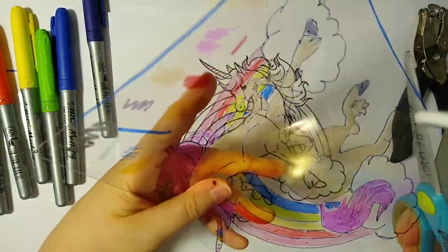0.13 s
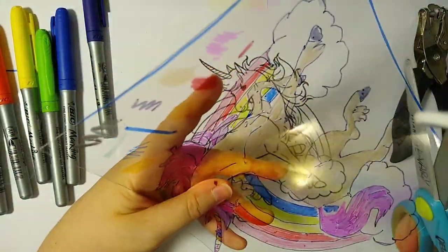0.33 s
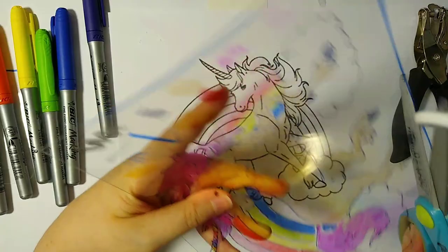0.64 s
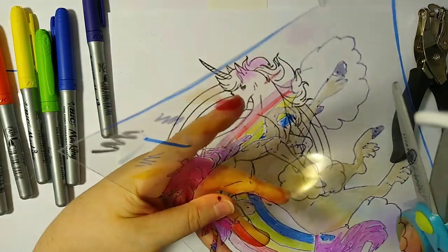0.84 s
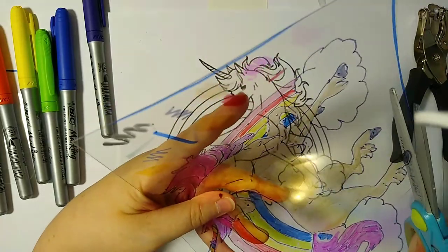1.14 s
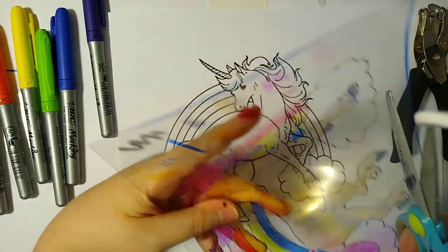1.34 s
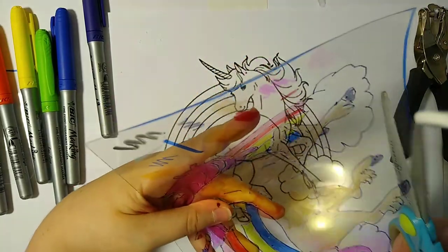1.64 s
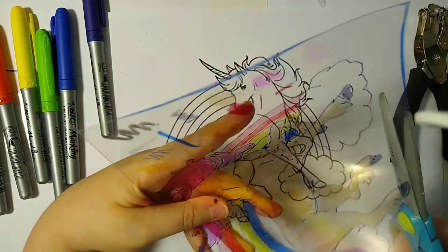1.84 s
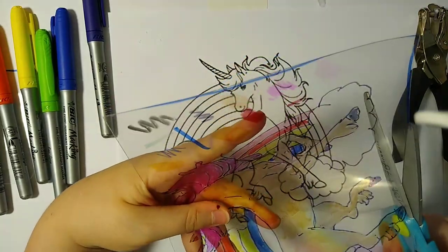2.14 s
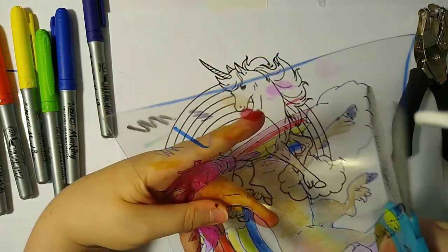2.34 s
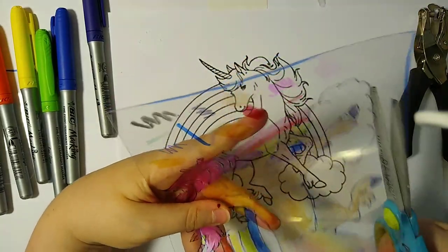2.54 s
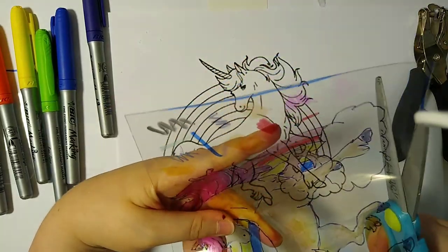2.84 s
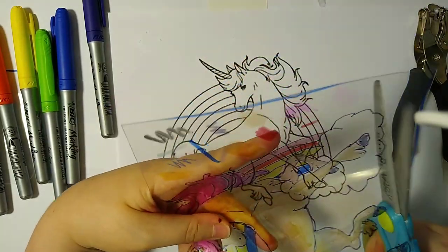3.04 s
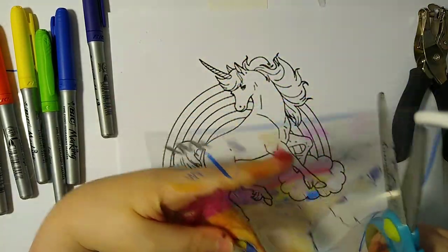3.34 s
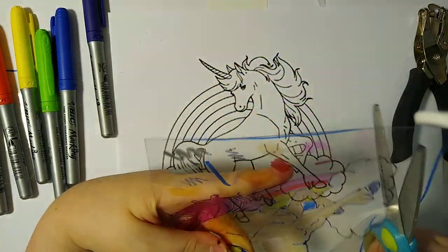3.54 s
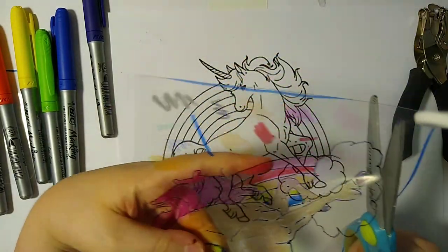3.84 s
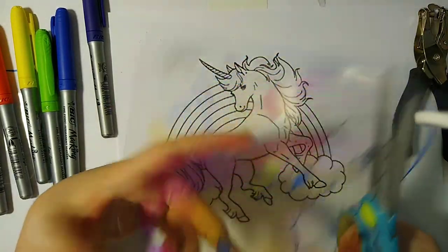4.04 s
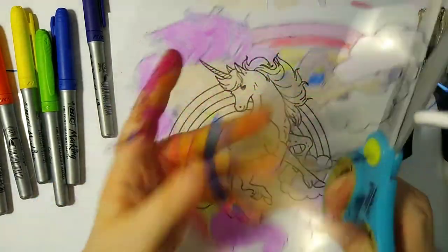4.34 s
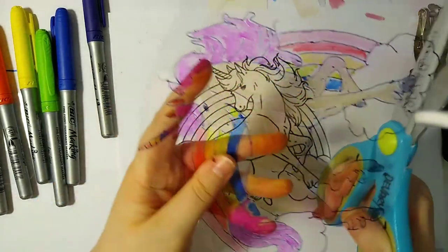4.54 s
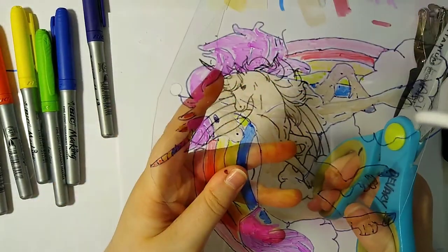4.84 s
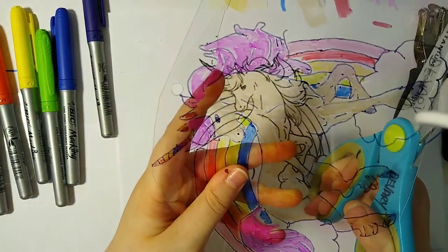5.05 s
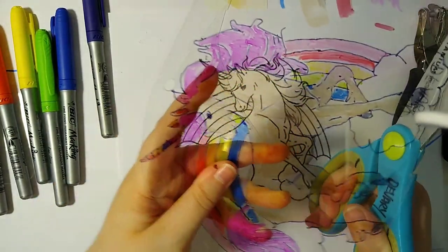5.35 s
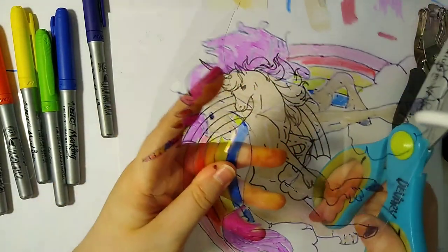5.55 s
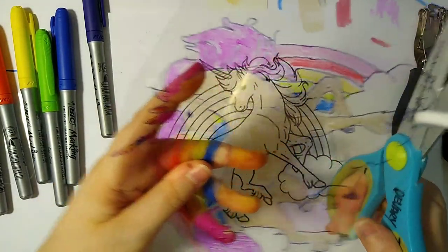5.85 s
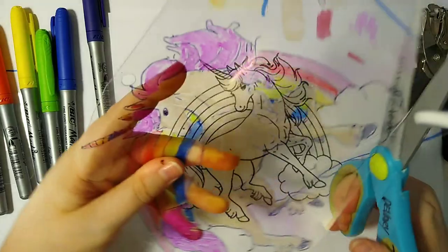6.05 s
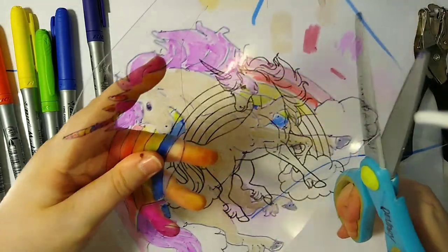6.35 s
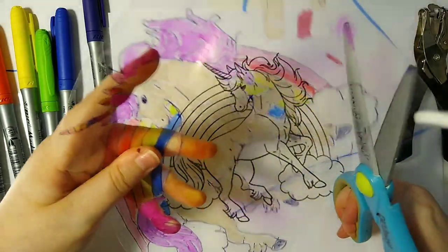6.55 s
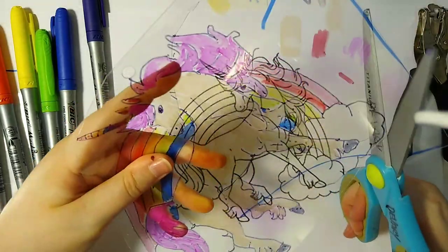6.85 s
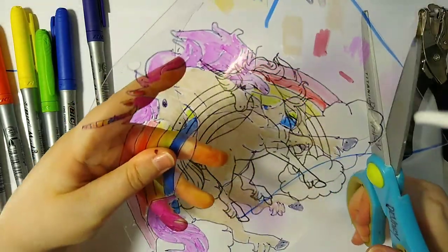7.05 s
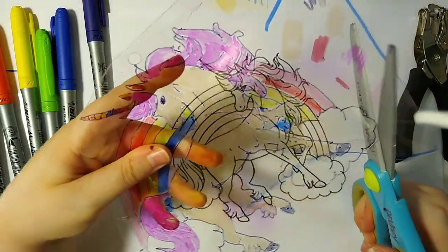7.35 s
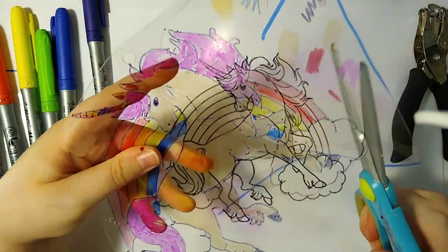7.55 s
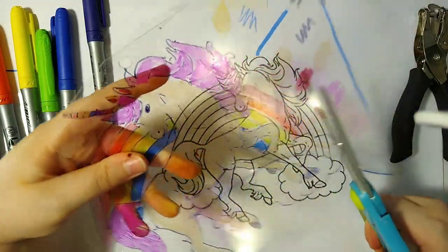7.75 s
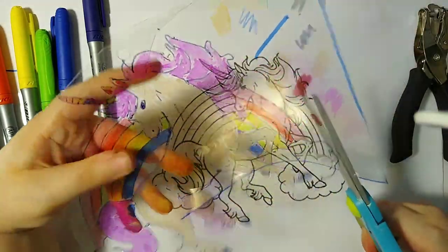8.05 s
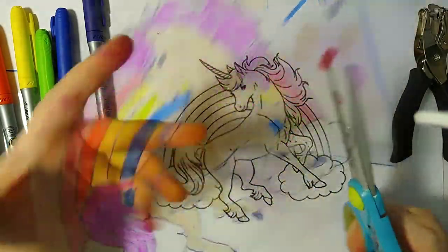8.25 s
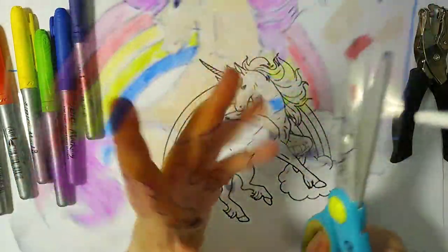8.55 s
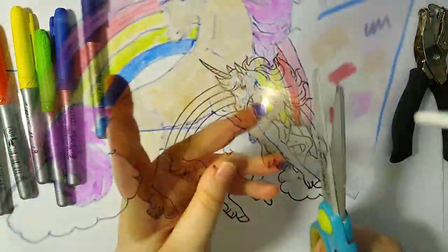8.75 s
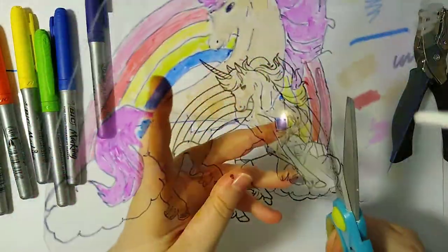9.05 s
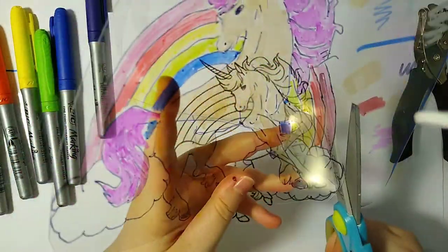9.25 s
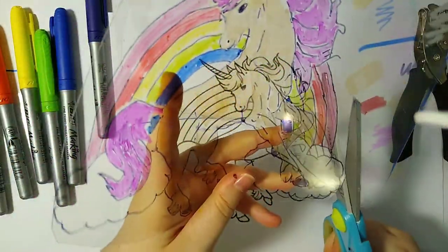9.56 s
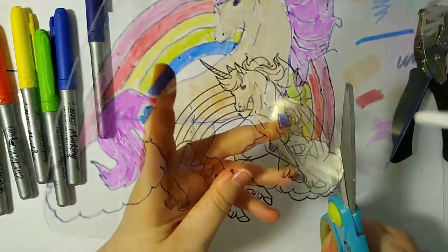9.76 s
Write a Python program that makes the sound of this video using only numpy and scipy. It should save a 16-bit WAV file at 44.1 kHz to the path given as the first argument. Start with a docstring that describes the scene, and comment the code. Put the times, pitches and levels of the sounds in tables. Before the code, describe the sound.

Crisp plastic cutting with rasping blade openings, sharp snaps and small woody ticks, heard close in a small quiet room with low rumble.

```python
"""Scissors work through a thin, stiff plastic sheet over a table in a small quiet room, above a low hum and rumble.
Cuts crunch and opening blades rasp (stick-slip friction through ringing modes); edges tick and plastic snaps.
Faint low tones glide through; later come soft knocks (table modes) and light scrapes of the flat blade.
Then the sheet rings briefly when tapped or flipped, bends and ticks woodily, and light rubbing makes it squeak;
cuts, scrapes and snaps return, and the last seconds bring more squeaks, woody creaks and one short cut."""
import sys
import numpy as np
from scipy import signal
from scipy.fft import rfft, irfft
from scipy.io import wavfile
from scipy.ndimage import uniform_filter1d

SR = 44100
rng = np.random.default_rng(int(sys.argv[2]) if len(sys.argv) > 2 else 0)


def master(y):
    """Save y as 16-bit WAV."""
    cut = np.clip(np.atleast_2d(y).T, -1, 1)
    pcm = np.round(cut * 32767)  # scale
    wavfile.write(sys.argv[1], SR, pcm.astype(np.int16))


N = 436590
TIME = np.arange(N) / SR


def from_db(db):
    """Logarithmic level: decibels become an amplitude gain."""
    return 10 ** (np.asarray(db) / 20)


def rms_one(x):
    """Effective value: scale to rms 1."""
    return x / np.sqrt(np.mean(x ** 2) + 1e-20)


def hold_even(x, size, floor):
    """Level control: divide by the running rms over size samples."""
    return x / np.sqrt(np.abs(uniform_filter1d(x ** 2, size=size)) + floor)


def level_over_time(rows):
    """Linear interpolation of a level curve (t/s, level/dB) at every sample."""
    t_s, level_db = np.transpose(rows)
    return np.interp(TIME, t_s, level_db)


def at_hz(points, hz):
    """Linear interpolation of a spectrum on a log-frequency axis."""
    f, value = np.transpose(points)
    return np.interp(np.log(hz + 1), np.log(f), value)


def band(x, low_hz, high_hz):
    """Causal band-pass filtering."""
    sos = signal.butter(2, [low_hz, high_hz], "band", fs=SR, output="sos")
    return signal.sosfilt(sos, x + 1e-18)


def first_order(x, hz, kind):
    """First-order filtering, low-pass or high-pass."""
    return signal.sosfilt(signal.butter(1, hz, kind, fs=SR, output="sos"), x)


def convolve(x, response):
    """Linear superposition: every sample launches one impulse response."""
    return signal.oaconvolve(x, response)[:len(x)]


def response_of(colour, size=4096):
    """Minimum phase: the folded cepstrum gives the causal impulse response of a given spectrum."""
    hz = np.arange(size // 2 + 1) * SR / size
    cepstrum = irfft(np.log(from_db(at_hz(colour, hz))))
    cepstrum[1:size // 2] *= 2
    cepstrum[size // 2 + 1:] = 0
    return irfft(np.exp(rfft(cepstrum)))


def resonance(x, hz, width_hz):
    """Damped resonance: one mode with gain 1 at its peak."""
    r = np.exp(-np.pi * width_hz / SR)
    numerator = [(1 - r * r) / 2, 0, (r * r - 1) / 2]
    return signal.lfilter(numerator, [1, -2 * r * np.cos(2 * np.pi * hz / SR), r * r], x)


# colour of the low rumble and of the faint room hiss: f/Hz, level/dB
RUMBLE_COLOUR = [(20, -29), (38, -14.5), (55, -3), (80, -4), (125, -1), (178, -8), (205, -17), (420, -35.5),
                 (1000, -63.5)]
HISS_COLOUR = [(450, -9.5), (900, 4), (1500, -6.5), (2400, -5), (4000, -13.5), (10000, -13.5), (15000, -19)]
# level of the rumble: t/s, level/dB
RUMBLE_LEVEL = [(0.0, -60.5), (4.3, -57.5), (5.2, -58.5), (7.8, -60), (9.9, -68.5)]


def rumble_and_hiss():
    """Filtered noise: random fluctuations coloured into a low rumble and a steady faint hiss."""
    rumble = rms_one(convolve(rng.standard_normal(N), response_of(RUMBLE_COLOUR)))
    hiss = rms_one(convolve(rng.standard_normal(N), response_of(HISS_COLOUR)))
    return from_db(level_over_time(RUMBLE_LEVEL)) * rumble + from_db(-81.5) * hiss


def wavering_tone(hz, db, waver_db, wander, per_s=9):
    """Random modulation: a sine whose level swells and sags and whose pitch strays slowly by a share."""
    t = TIME[:len(db)]
    swells, strays = rng.standard_normal((int(t[-1] * per_s) + 2, 2)).T
    knots = np.arange(len(swells))
    pitch = hz * np.exp(wander * np.interp(2 * t, knots, strays))
    level_db = db + waver_db * np.interp(t * per_s, knots, swells)
    return from_db(level_db) * np.sqrt(2) * np.sin(2 * np.pi * np.cumsum(pitch) / SR)


HUM_HZ = 58.56
# common level of the hum: t/s, level/dB
HUM_LEVEL = [(0, -62), (2.8, -58), (3.7, -62.5), (4.7, -55), (5.6, -79), (7, -69.5)]
# its partials: multiple of the fundamental, level/dB on top of the common level
HUM_PARTIALS = [(1, -13), (2, -2.5), (3, -11.5)]


def hum():
    """Harmonic series: partials at whole multiples of one fundamental, each wavering on its own."""
    level_db = level_over_time(HUM_LEVEL)
    return sum(wavering_tone(order * HUM_HZ, level_db + db, waver_db=5.0, wander=0.028)
               for order, db in HUM_PARTIALS)


# resonances of sheet and blades: f/Hz, width/Hz, lift/dB
SHEET_MODES = [(528, 8.3, 2), (900, 360, -0.5), (1230, 76, 0), (1683, 42, 2.5), (1851, 97, 6),
               (2250, 280, -2), (2442, 260, 4.5), (3040, 85, -0.5), (5634, 86, 0.5)]
SHEET_DETUNE = .025   # typical share by which a new grip shifts all the sheet's resonances


def sheet_response(colour):
    """Modal radiation: one tiny crack as a broad colour plus ringing modes, tuned by the grip."""
    crack = response_of(colour)
    tuning = np.exp(SHEET_DETUNE * rng.standard_normal())
    ringing = sum(from_db(lift_db) * resonance(crack, hz * tuning, width_hz)
                  for hz, width_hz, lift_db in SHEET_MODES)
    return crack + ringing


def registers(x):
    """Band splitting: the sheet's drumming, the crunch (polarity reversed) and the bright edge noise."""
    return band(x, 90, 1300), -band(x, 1300, 5000), band(x, 5000, 20000)


def flutter(ring_s, direct_db, size=2048):
    """Multiple reflection: bending waves echo between edges and grip as dense decaying noise; energy 1."""
    echoes = rng.standard_normal(size) * np.exp(-TIME[:size] / ring_s)
    echoes = rms_one(first_order(echoes, 900, "high")) / np.sqrt(size)
    echoes[0] += from_db(direct_db)
    return rms_one(echoes) / np.sqrt(size)


HOLD_S = .09   # longest spacing between successive sets of resonances


def shifting_flutter(x, ring_s, direct_db):
    """Time-varying resonance: as the sheet bends, one set of echoes crossfades into the next."""
    count = int(len(x) / SR / HOLD_S) + 2
    place = np.linspace(0, count - 1, len(x))
    out = np.zeros(len(x))
    for k in range(count):
        weight = np.cos(np.pi / 2 * np.clip(place - k, -1, 1))
        out += convolve(x * weight, flutter(ring_s, direct_db))
    return out


def stick_slip(per_s, jitter, spread_db, slip_s, rub_db, rub_hz):
    """Stick-slip friction: uneven catches release bright showers of cracks over duller rubbing."""
    gaps, sizes = rng.standard_normal((12000, 2)).T
    at = (np.cumsum(np.exp(jitter * gaps)) / per_s * SR).astype(int)
    inside = at < N
    slips = np.zeros(N)
    slips[at[inside]] = from_db(spread_db * np.clip(sizes[inside], -2, 2))
    showers = signal.lfilter([1], [1, -np.exp(-1 / (slip_s * SR))], slips + 1e-18)
    rubbing = first_order(rng.standard_normal(N), rub_hz, "low")
    return rms_one(showers) * rng.laplace(size=N) + from_db(rub_db) * rubbing


def strokes(rows, gesture, friction, colour, attack_s, release_s, ring_s, direct_db,
            drum_follows, edge_follows):
    """Source and resonator: friction drives the sheet; a gesture shapes the force in three registers."""
    out = np.zeros(N)
    for s, length_s, force_db, *shape, drum_db, bright_db in rows:
        span = slice(max(int((s - 2 * attack_s) * SR), 0), int((s + length_s + release_s) * SR))
        t = TIME[span] - s
        edges_s = [-attack_s, attack_s / 2, length_s, length_s + release_s]
        contact = np.interp(t, edges_s, [0, 1, 1, 0]) ** 2
        swing_db = gesture(t, length_s, *shape)
        sound = shifting_flutter(convolve(friction[span], sheet_response(colour)), ring_s, direct_db)
        levels = (drum_db + drum_follows * swing_db, swing_db, bright_db + edge_follows * swing_db)
        for part, db in zip(registers(sound), levels):
            # the hand keeps the mean effort steady from slip to slip
            out[span] += contact * from_db(force_db + db) * hold_even(part, 2000, 1e-20)
    return out


BITE_BUILD_DB_PER_S = 184   # growth of the force before the hardest bite


def bite(t, length_s, fade_db_per_s, hardest_s=0):
    """Exponential growth and decay: force (dB) builds to the hardest bite, then changes steadily."""
    past_s = np.clip(t, 0, length_s) - hardest_s
    return np.minimum(BITE_BUILD_DB_PER_S * past_s, -fade_db_per_s * past_s)


# blades closing through the sheet: t/s, length/s, force level/dB, fade/(dB/s),
# time to the hardest bite/s, drumming relative level/dB, bright edge relative level/dB
CLOSINGS = [(0.0, 0.073, -46, 71, 0.0043, 3, -4.5), (0.587, 0.11, -38, 112, 0.0036, 1.5, -10.5),
            (1.251, 0.13, -38, 142, 0.0024, 0.5, -4.5), (1.843, 0.13, -44, 150, 0.024, 4.5, 2.5),
            (2.532, 0.19, -40.5, 150, 0.044, -4.5, 1), (3.25, 0.12, -35.5, 193.5, 0.021, -6.5, -2),
            (3.558, 0.068, -33, 251, 0.0045, -23, -7.5), (6.463, 0.112, -38, 273, 0.004, -2, 2.5),
            (6.562, 0.074, -44, 125, 0.0046, -8.5, -1.5), (8.065, 0.34, -51.5, 319, 0.011, 10, 13.5),
            (9.877, 0.024, -38, 33, 0.0083, -13, -16.5)]
# colour of the cuts: f/Hz, level/dB
CLOSING_COLOUR = [(120, -59.5), (230, 0), (400, 1.5), (850, -1), (1350, -12.5), (2400, -12.5),
                  (4000, -10.5), (7000, -8), (9500, -4.5), (15500, -11.5)]


def cuts():
    """Stick-slip fracture: closing blades bite in rapid slips and the sheet drums along."""
    tearing = stick_slip(per_s=220, jitter=.5, spread_db=2.5, slip_s=.002, rub_db=2, rub_hz=4000)
    return strokes(CLOSINGS, bite, tearing, CLOSING_COLOUR, attack_s=0.012, release_s=0.041,
                   ring_s=0.0058, direct_db=-3.5, drum_follows=0.83, edge_follows=0.99)


def sweep(t, length_s, ends_db):
    """Parabolic envelope: the force (dB) of a slide follows one arch about mid-stroke."""
    return -ends_db * np.clip(2 * t / length_s - 1, -1, 1) ** 2


# blades opening, edges rasping on each other and on the slit: t/s, length/s, mid-stroke force level/dB,
# drop at both ends/dB, drumming relative level/dB, bright edge relative level/dB
OPENINGS = [(0.138, 0.032, -58.5, 7, -1.5, -21), (0.332, 0.15, -50, 4.5, 0, -3),
            (0.922, 0.19, -49, 11, -2.5, 1.5), (1.594, 0.11, -48.5, -0.5, 1, 1.5),
            (2.277, 0.14, -43, 8, -2, -7.5), (2.945, 0.195, -41.5, 23.5, -13, -8.5),
            (5.408, 0.13, -45, 17, -6, -4.5), (5.727, 0.34, -55.5, -1, -1.5, 4)]
# colour of the opening blades: f/Hz, level/dB
OPENING_COLOUR = [(120, -11), (380, -9.5), (700, -6), (1080, -7.5), (1600, -10.5), (2400, -12.5),
                  (3600, -10.5), (6000, -5), (10000, 4.5), (15500, -1)]


def slides():
    """Sliding friction: opening blades rasp in slower slips under an arched force."""
    rasping = stick_slip(per_s=86, jitter=0.24, spread_db=4.0, slip_s=0.0062, rub_db=5.5, rub_hz=3020)
    return strokes(OPENINGS, sweep, rasping, OPENING_COLOUR, attack_s=0.018, release_s=0.024,
                   ring_s=0.0032, direct_db=-3.0, drum_follows=0.43, edge_follows=0.7)


# dry ticks as the cutting edges catch and jump: t/s, peak level/dB
EDGE_TICKS = [(0.344, -37), (3.954, -30), (4.2588, -17), (4.373, -31), (4.519, -30.5), (5.052, -36),
              (5.074, -33), (5.084, -39), (8.577, -27)]


def ticks(fade_s, shiver_db, shiver_s, strain_s, size=1500):
    """Impulsive release: an edge strains, then jumps with a short crack within a faint blade shiver."""
    out = np.zeros(N + size)
    before = size // 4
    t = TIME[:size] - TIME[before]
    crack = (t >= 0) * np.exp(-np.abs(t) / fade_s)
    shiver = from_db(shiver_db) * np.exp(np.minimum(t / strain_s, -t / shiver_s))
    for s, peak_db in EDGE_TICKS:
        burst = band(rng.standard_normal(size) * (crack + shiver), 840, 13000)
        tick = convolve(burst, flutter(ring_s=0.0006, direct_db=-4))
        at = int(s * SR) - before
        out[at:at + size] += from_db(peak_db) * tick / np.abs(tick).max()
    return out[:N]


# single snaps of the plastic: t/s, relative level/dB, tilt/dB (added to the treble, half taken off the bass)
BUCKLES = [(0.597, -36.5, 8), (1.086, -29.5, 6), (1.712, -39.5, -12), (2.267, -41.5, -5), (2.4, -28, 3),
           (3.039, -32.5, -1), (3.082, -25, 4.5), (3.563, -26.5, 26), (3.613, -32.5, 4), (3.955, -22.5, -5),
           (4.0, -26.5, -1), (4.12, -27.5, 26), (4.186, -21, 9), (4.255, -23.5, 11), (4.27, -19.5, 8.5),
           (4.354, -32.5, -2), (4.386, -19.5, 10), (4.4, -21, 8), (4.574, -30, 0.5), (4.777, -36, 24),
           (5.808, -26, 10), (5.848, -34, 11), (5.909, -25.5, 15), (6.028, -28, 16), (6.463, -22.5, 2.5),
           (6.736, -33.5, -33), (7.146, -40, 3.5), (8.024, -33.5, -3.5), (8.42, -24.5, 23),
           (8.524, -26, 34), (8.608, -27.5, 8), (8.711, -34.5, 27), (9.594, -32.5, 6.5)]
# colour of the snaps: f/Hz, level/dB
BUCKLE_COLOUR = [(120, 7.5), (400, -9), (950, 1.5), (1500, -10), (2500, -9.5), (4000, -11), (8000, -12.5),
                 (11000, -8.5), (15500, -17.5)]


def snaps(shiver_s, crack_db, rise_s, growth, size=4096):
    """Elastic buckling: a sharp crack, then a shiver that lasts longer the harder the snap."""
    out, t = np.zeros(N + size), TIME[:size]
    body = sheet_response(BUCKLE_COLOUR)
    usual_db = np.mean(np.array(BUCKLES)[:, 1])
    for s, level_db, tilt in BUCKLES:
        lasting_s = shiver_s * from_db(growth * (level_db - usual_db))
        envelope = np.exp(-t / lasting_s) * (1 - np.exp(-t / rise_s))
        push = rms_one(rng.standard_normal(size) * envelope)
        push[int(rise_s * SR)] += from_db(crack_db) * np.sqrt(size)
        sound = convolve(convolve(push, body), flutter(ring_s=0.0086, direct_db=4.5))
        tilted = from_db([-tilt / 2, 0, tilt]) @ np.array(registers(sound))
        at = int((s - rise_s) * SR)
        out[at:at + size] += from_db(level_db) * rms_one(tilted)
    return out[:N]


# low gliding tones: start t/s, loudest t/s, end t/s, start f/Hz, end f/Hz, level/dB before wavering
GLIDING_TONES = [(0.905, 1.2, 1.38, 152, 110.3, -57), (5.722, 6.876, 7.17, 70, 139, -49.5),
                 (7.802, 8.297, 8.6, 110.6, 141, -56.5), (8.805, 9.348, 9.4, 147, 156.4, -65.5)]
GLIDE_FADE_DB_PER_S, GLIDE_EDGE_S = 14.5, .1


def glides():
    """Exponential frequency glide: equal pitch steps in equal times while each tone swells and fades."""
    out = np.zeros(N)
    for start, loudest, end, start_hz, end_hz, db in GLIDING_TONES:
        span = slice(max(int((start - GLIDE_EDGE_S) * SR), 0), int((end + GLIDE_EDGE_S) * SR))
        t = TIME[span]
        hz = np.exp(np.interp(t, [start, end], np.log([start_hz, end_hz])))
        fade = np.clip(1 + np.minimum(t - start, end - t) / GLIDE_EDGE_S, 0, 1)
        level_db = db - GLIDE_FADE_DB_PER_S * np.abs(t - loudest)
        out[span] += fade * wavering_tone(hz, level_db, waver_db=5.5, wander=0.0201)
    return out


# soft knocks of the hand on the table: t/s, relative level/dB
HAND_KNOCKS = [(2.286, -29.5), (2.401, -29.5), (6.465, -34), (7.775, -29.5), (8.391, -36)]
# modes of the table top: f/Hz, relative level/dB, T60/s
TABLE_TOP_MODES = [(104, 1.5, 0.11), (145.3, 5.5, 0.13), (175.5, -3.5, 0.22), (248, -3.5, 0.11),
                   (299, 4, 0.049)]


def knocks(size=12000):
    """Modal impulse response: the table top answers each blow with a few dull decaying modes."""
    t, blows, thud = TIME[:size], np.zeros(N), np.zeros(size)
    for s, db in HAND_KNOCKS:
        blows[int(s * SR)] = from_db(db)
    for k, (hz, db, t60) in enumerate(TABLE_TOP_MODES):
        polarity = (-1) ** k
        thud += polarity * from_db(db - 60 * t / t60) * np.sin(2 * np.pi * hz * t)
    return convolve(blows, thud)


# the flat of a blade grazing the sheet: t/s, length/s, mid-stroke force level/dB,
# drop at both ends/dB, drumming relative level/dB, bright edge relative level/dB
LIGHT_SCRAPES = [(2.72, 0.12, -56.5, 13, -7.5, 1.5), (3.492, 0.04, -58, 1.2, -20, 4.5),
                 (3.76, 0.2, -64, 5.1, -21, -2), (6.05, 0.14, -61.5, 8.7, 0, -3),
                 (6.255, 0.062, -71, 3, -7, 15), (6.65, 0.1, -62, 2.2, -6.5, 7),
                 (7.655, 0.12, -60.5, 3.8, 4, 17.5), (7.98, 0.04, -70.5, 2, -2.5, 1),
                 (8.2, 0.2, -56.5, 8.1, -31, 12.5), (8.52, 0.18, -50.5, 7.7, -9.5, 4.5),
                 (8.73, 0.11, -58.5, 19.9, 11, 17), (9.56, 0.157, -63.5, 7.5, 1, -11)]
# colour of the grazes: f/Hz, level/dB
SCRAPE_COLOUR = [(400, -2), (950, -4.5), (1600, -17.5), (2500, -15), (3900, -14.5), (6200, -6.5),
                 (9500, -3), (15500, -14)]


def grazes():
    """Light sliding friction: the flat blade scrapes in sparse, uneven slips."""
    scraping = stick_slip(per_s=61, jitter=0.66, spread_db=3.5, slip_s=0.016, rub_db=1.0, rub_hz=3500)
    return strokes(LIGHT_SCRAPES, sweep, scraping, SCRAPE_COLOUR, attack_s=0.014, release_s=.035,
                   ring_s=0.0046, direct_db=-11.5, drum_follows=0.51, edge_follows=3.2)


# the sheet ringing briefly when tapped or flipped: t/s, relative level/dB, centre f/Hz
SHEET_RINGS = [(3.566, -28, 1033), (4.045, -27, 580), (4.074, -28, 759), (4.217, -23.5, 796),
               (8.073, -29, 934), (8.429, -30, 983)]


def sheet_rings(swell_s, glide_per_s, spread, size=6000):
    """Free vibration: a cluster of low modes, each sliding up or down in pitch at random."""
    out, t = np.zeros(N), TIME[:size]
    swell = t / swell_s * np.exp(1 - t / swell_s)
    for s, db, hz in SHEET_RINGS:
        cluster = np.zeros(size)
        for detune, slide, phase in rng.standard_normal((6, 3)):
            pitch = hz * np.exp(spread * detune + glide_per_s * slide * t)
            cluster += np.sin(2 * np.pi * np.cumsum(pitch) / SR + np.pi * phase)
        at = int((s - swell_s / 2) * SR)
        out[at:at + size] += from_db(db) * swell * rms_one(cluster)
    return out


# the sheet bending as it is turned, then relaxing: t/s, length/s, force level/dB, fade/(dB/s),
# drumming relative level/dB, bright edge relative level/dB
BENDS = [(3.64, 0.12, -61.5, 55, 6, 11.5), (3.96, 0.19, -47, -5, -2, -2), (4.19, 0.052, -43, 205, 12, -8),
         (4.256, 0.045, -32.5, 198, 0, 0), (4.383, 0.14, -44, 60, -5, -4.5),
         (4.577, 0.16, -55, 39, -3, -10), (4.745, 0.078, -68, 36, -20, -4),
         (8.388, 0.13, -45.5, 110, 9, 10), (8.782, 0.24, -46.5, 51, 2, -1)]
# colour of the bending: f/Hz, level/dB
BEND_COLOUR = [(120, -6), (350, -1), (720, -0.5), (1300, -7.5), (2300, -12.5), (4000, -12), (10000, 0),
               (15500, -9.5)]


def flexes(creasing):
    """Internal friction: the bending sheet crackles in very uneven slips."""
    return strokes(BENDS, bite, creasing, BEND_COLOUR, attack_s=0.02, release_s=0.042,
                   ring_s=0.0031, direct_db=-6.5, drum_follows=1.14, edge_follows=0.95)


# short woody ticks: the sheet's loose edge tapping the blade, later the blades creeping in the slit:
# t/s, relative level/dB
WOODY_TICKS = [(3.655, -48), (3.672, -47), (3.692, -44), (3.718, -49.5), (3.736, -51), (5.052, -59),
               (5.074, -57), (5.087, -51), (5.109, -44.5), (5.145, -46.5), (5.2, -53), (5.245, -46),
               (5.762, -47), (7.063, -61), (7.094, -67), (7.151, -61), (9.501, -59.5), (9.532, -50),
               (9.546, -53.5), (9.571, -47.5), (9.59, -51), (9.613, -50.5), (9.643, -43), (9.683, -48.5),
               (9.707, -48.5), (9.88, -40)]
# what they ring with: f/Hz, width/Hz, level/dB
WOODY_MODES = [(603, 94, -6), (980, 200, 7), (1108, 46, -2), (1783, 120, 2.5), (2210, 88, 0),
               (2560, 250, -4), (7800, 427, -5)]


def woody_ticks(scuff_s, rise_s, scatter_db, again_s, again_db, detune, rise_per_s, size=2000):
    """Modal excitation: a soft scuff and a weaker second one strike woody modes that rise in pitch."""
    out, t = np.zeros(N + size), TIME[:size]
    rings = []
    for hz, width_hz, db in WOODY_MODES:
        ring = np.exp(-np.pi * width_hz * t) * np.cos(2 * np.pi * hz * t)
        rings.append(from_db(db) * rms_one(band(ring, hz / 2, hz * 2)))
    scuff = np.exp(-t / scuff_s) * (1 - np.exp(-t / rise_s))
    scuffs = scuff + from_db(again_db) * np.interp(t - again_s, t, scuff)
    for s, level_db in WOODY_TICKS:
        # every tick strikes each mode with a strength of its own
        body = from_db(scatter_db * rng.standard_normal(len(rings))) @ np.array(rings)
        sound = convolve(rng.standard_normal(size) * scuffs, body)
        tuning = np.exp(detune * rng.standard_normal() + rise_per_s * (t / 2 - again_s))
        at = int((s - rise_s) * SR)
        out[at:at + size] += from_db(level_db) * rms_one(np.interp(t * tuning, t, sound))
    return out[:N]


def singing(friction, modes, damping, low_hz, high_hz):
    """Friction-driven resonance: noise heard through a set of modes, its level held even."""
    x = sum(from_db(db) * rms_one(resonance(friction, hz, width_hz * damping))
            for hz, width_hz, db in modes)
    return hold_even(band(x, low_hz, high_hz), 3000, 1e-12)


# a blade sliding lightly along the slit: t/s, length/s, sheet level/dB, steel level/dB,
# damping (factor on the modes' widths), rise of the slit's pitch (share)
LIGHT_RUBS = [(4.998, 0.029, -72, -72, 0.51, 0.077), (6.939, 0.064, -69.5, -65, 1.55, 0.015),
              (7.343, 0.313, -68, -62.5, 1.3, 0.01), (8.221, 0.115, -62, -48, 0.38, 0.18),
              (9.12, 0.166, -77, -74, 0.18, 0.025), (9.469, 0.089, -73.5, -76, .5, 0.13)]
# what sings, slit and steel, before damping: f/Hz, width/Hz, level/dB
SINGING_SLIT = [(919, 92, 4.5), (1236, 30, -3.5), (1936, 19, -7.5), (2370, 390, 3)]
SINGING_STEEL = [(5770, 130, -1), (6030, 55, 3.5), (6760, 110, 8), (7440, 740, 9.5), (9450, 270, 4.5),
                 (10500, 260, 2)]


def squeaks(friction, edge_s):
    """Friction-excited modes: those of the slit rise as it tightens, those of the steel stay."""
    out = np.zeros(N)
    for s, length_s, sheet_db, steel_db, damping, rise in LIGHT_RUBS:
        span = slice(int(s * SR), int((s + length_s) * SR))
        t = TIME[span] - s
        slit = singing(friction[span], SINGING_SLIT, damping, 600, 3000)
        steel = singing(friction[span], SINGING_STEEL, damping, 5000, 16000)
        # reading ever faster makes the pitch rise
        rising = np.interp(t + rise * t * (t / length_s - 1) / 2, t, slit)
        touch = np.clip(np.minimum(t, length_s - t) / edge_s, 0, 1)
        out[span] += touch * (from_db(sheet_db) * rising + from_db(steel_db) * steel)
    return out


ROOM_DB, ROOM_T60_S = -13, 0.34


def room(x, build_s, size=26000):
    """Diffuse reverberation: reflections build up, then decay exponentially."""
    t = TIME[:size]
    tail = band(rng.standard_normal(size), 90, 20000)
    tail = tail * from_db(-60 * t / ROOM_T60_S) * (1 - np.exp(-t / build_s))
    return convolve(x, rms_one(tail) / np.sqrt(size))


def scene():
    """Superposition: scissors, sheet and table close by, their reverberation and the background."""
    near = cuts() + slides()
    near += ticks(fade_s=0.00064, shiver_db=-12.5, shiver_s=.004, strain_s=0.0024)
    near += from_db(-21.0) * snaps(shiver_s=0.0078, crack_db=-6.5, rise_s=.0025, growth=0.11)
    near += from_db(-10.5) * knocks()
    near += grazes()
    near += from_db(-9.5) * sheet_rings(swell_s=0.01067, glide_per_s=1.1, spread=.15)
    creasing = stick_slip(per_s=70, jitter=0.64, spread_db=6.5, slip_s=0.017, rub_db=-6.5, rub_hz=4000)
    near += flexes(creasing)
    near += from_db(-6.0) * woody_ticks(scuff_s=0.004, rise_s=0.0016, scatter_db=2.5, again_s=0.0071,
                                        again_db=-9.5, detune=.035, rise_per_s=1.8)
    near += squeaks(creasing, edge_s=0.017)
    background = rumble_and_hiss() + hum() + glides()
    return (near + from_db(ROOM_DB) * room(near, build_s=0.0083) + background)[None]


CUTOFF_HZ = 15800


def record(dry):
    """Elliptic low-pass filtering: the top is cut steeply."""
    return signal.sosfilt(signal.ellip(10, .1, 70, CUTOFF_HZ, fs=SR, output="sos"), dry)


dry = scene()
out = record(dry)
master(out)
```